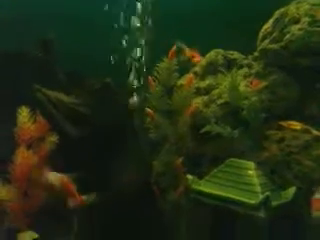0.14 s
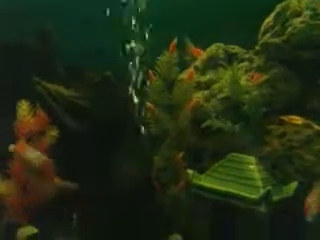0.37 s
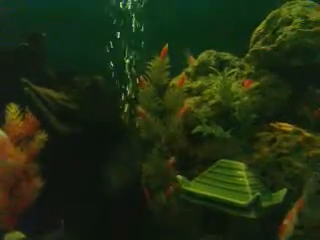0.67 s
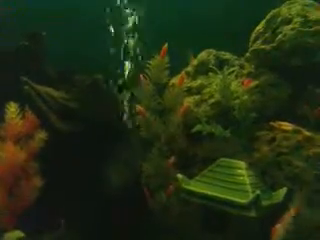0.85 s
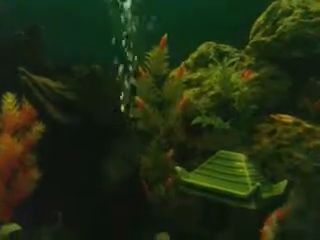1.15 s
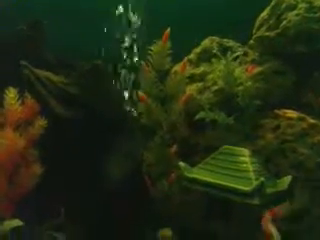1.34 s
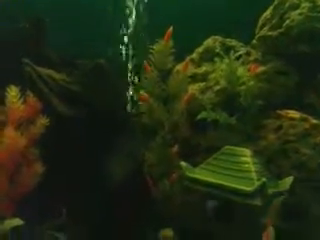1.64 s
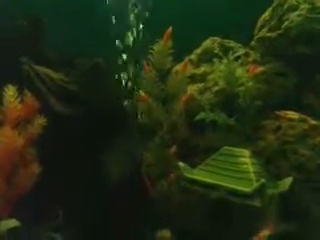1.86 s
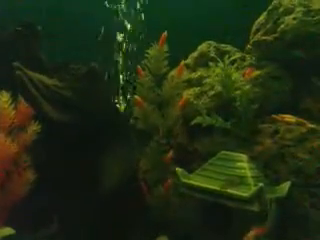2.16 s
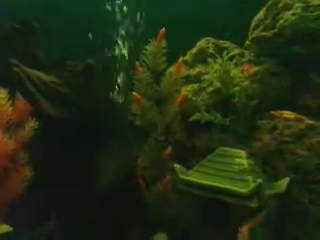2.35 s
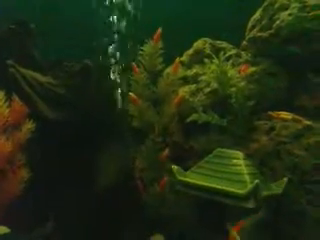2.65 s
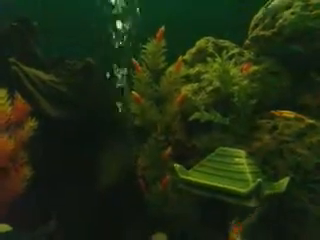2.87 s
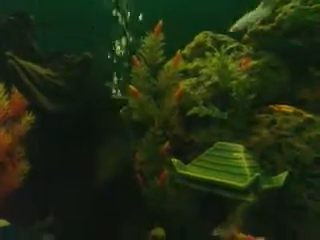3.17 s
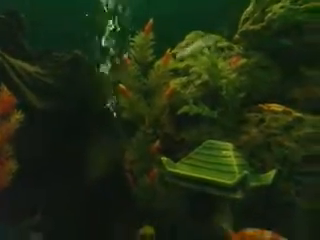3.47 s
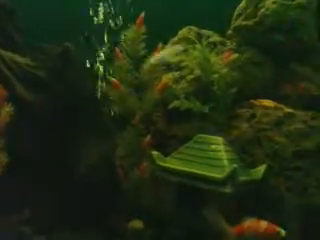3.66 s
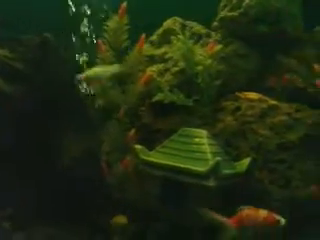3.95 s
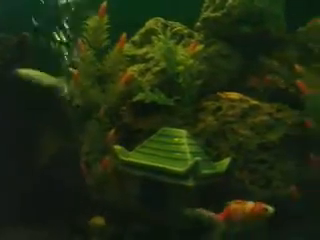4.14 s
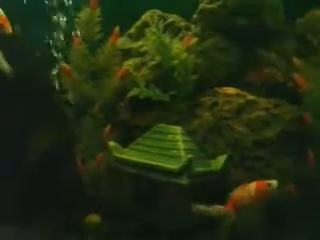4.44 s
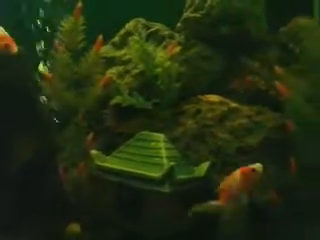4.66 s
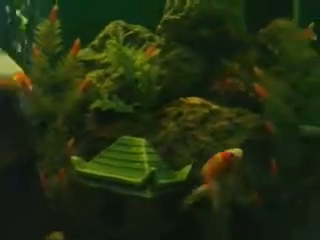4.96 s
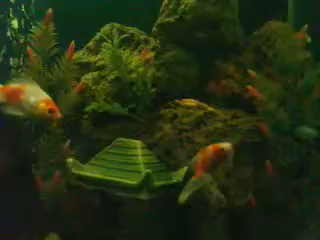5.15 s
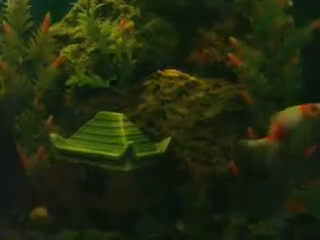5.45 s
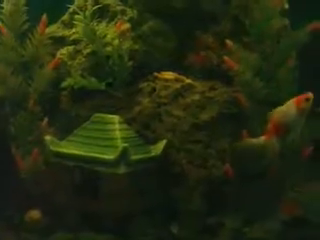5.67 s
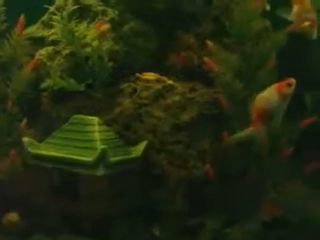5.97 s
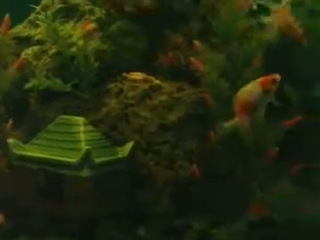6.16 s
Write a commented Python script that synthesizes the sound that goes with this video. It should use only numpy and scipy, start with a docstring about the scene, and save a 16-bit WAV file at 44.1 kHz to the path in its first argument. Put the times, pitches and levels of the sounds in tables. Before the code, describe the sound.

Continuous aquarium bubbling and low electric pump hum, brief high airy squeaks in the middle, then two loud, distorted knocks close to the microphone.

```python
"""A diaphragm air pump hums at mains rate beside a home fish tank, a harmonic series heard from close by.
Bubbles, as damped resonators, gurgle and fizz; noise makes the wash around them and the hiss of air.
Thin fluttering squeals come in three bouts, perhaps air forced through the line, with a few lone peeps.
The microphone drifts along the tank into another mix of the hum. Small pops come early; two sharp knocks
near the end overload the amplifier, which clips. The microphone is narrow-band."""
import sys
import numpy as np
from scipy.fft import rfft, irfft, next_fast_len
from scipy.io import wavfile
from scipy.ndimage import map_coordinates

SR = 44100
rng = np.random.default_rng(int(sys.argv[2]) if len(sys.argv) > 2 else 0)


def pcm_store(signal):
    """Save signal as 16-bit PCM."""
    levels = np.round(np.clip(np.atleast_2d(signal), -1, 1) * 32767)
    wavfile.write(sys.argv[1], SR, levels.astype(np.int16).T)


N = 278271

MAINS_HZ = 49.663  # stroke rate of the pump
# Harmonics of the pump. Each row: multiple of the stroke rate, level in dB in front of the bubbles,
# level in dB further along the tank.
PUMP_HARMONICS = [(3, -54, -74.5), (4, -29.5, -28.5), (5, -38.5, -38), (6, -40.5, -45), (7, -46.5, -35.5),
                  (8, -33.5, -43.5), (9, -41, -38), (10, -28, -43), (11, -35, -40), (12, -26.5, -26),
                  (13, -46.5, -49), (14, -34.5, -38), (15, -44, -36), (16, -34.5, -31), (17, -39, -41.5),
                  (18, -39, -65), (19, -49.5, -54.5), (20, -48, -57.5), (21, -31.5, -36.5),
                  (22, -41, -75.5), (23, -39.5, -51.5), (24, -51.5, -47.5), (25, -51, -33), (26, -61, -45),
                  (27, -42.5, -43), (28, -52, -39.5), (29, -48, -42.5), (30, -43, -53.5)]
# Drift of the microphone. Each row: time in seconds, share of the way along the tank (0-1).
MIC_DRIFT = [(0, 0), (3.3, 0.29), (4.0, .35), (4.7, 0.75), (5.3, 0.89), (6.3, 0.99)]
# Spectrum of the large bubbles and their wash. Each row: frequency in Hz, relative gain in dB.
GURGLE_SPECTRUM = [(25, -18), (50, -7.5), (90, -3), (135, -5), (175, 2), (225, 2), (280, -1), (450, -1),
                   (750, 1), (1100, -3), (1600, -14.5), (2200, -32), (4000, -48.5)]
# Level of the gurgle in dB in front of the column, and its change in dB further along the tank.
GURGLE_DB, GURGLE_ALONG_DB = -26, 1
# Spectrum of the small bubbles and their wash. Each row: frequency in Hz, relative gain in dB.
FIZZ_SPECTRUM = [(400, -26), (900, -3), (1500, 0), (1750, -2.5), (2050, -6), (2400, -4), (2800, -8.5),
                 (3200, -9), (3600, -14.5), (4000, -20.5), (4500, -30)]
# Course of the fizz. Each row: time in seconds, level in dB before the trim in water().
FIZZ_COURSE = [(0.0, -30.5), (1.4, -29), (1.91, -30.5), (2.9, -32), (3.28, -31.5), (3.83, -31),
               (4.51, -30.5), (6.07, -31), (6.3, -29.5)]
# Spectrum of the escaping air. Each row: frequency in Hz, relative gain in dB.
HISS_SPECTRUM = [(1500, -28), (2300, -10), (2750, 2.5), (3000, 0.5), (3150, 1.5), (3400, -9.5),
                 (3700, -20.5), (4500, -31.5)]
# The two resonances that squeal; linear rise time and exponential decay constant of a squeal.
LOW_HZ, HIGH_HZ = 2557, 2988
ATTACK_S, RELEASE_S = 0.017, 0.018
# Squeals in three bouts. Each row: start in seconds, time in seconds until the decay begins,
# low resonance in dB, high resonance in dB, both before the trims in squeals().
SQUEAL_EVENTS = [(1.375, .04, -42, -38), (1.462, .1, -38.5, -33), (1.636, 0.17, -26.5, -38.5),
                 (1.746, 0.13, -25.5, -30), (1.879, 0.058, -39.5, -29.5), (1.951, 0.087, -33.5, -23),
                 (2.135, 0.039, -44, -37), (2.268, 0.037, -35, -50), (2.6, 0.038, -39.5, -33),
                 (2.674, 0.03, -25.5, -23.5), (2.73, 0.024, -33, -20.5), (2.772, 0.14, -38.5, -32),
                 (2.93, 0.017, -42, -32.5), (3.09, .05, -34, -42), (3.141, .065, -29.5, -25.5),
                 (3.217, 0.037, -38, -18.5), (3.281, 0.092, -33.5, -27), (3.391, .06, -29, -25),
                 (3.459, .05, -33, -34), (3.575, 0.034, -32, -46), (3.66, .05, -38, -50)]
# Lone peeps, some pure and some airy. Each row: middle in seconds, length in seconds, pitch in Hz,
# pitch waver in Hz, level in dB.
PEEP_EVENTS = [(0.298, 0.22, 1677, 81, -28.5), (.7, .25, 2724, 82, -39), (.97, 0.11, 1733, 7.8, -26.5),
               (1.195, 0.4, 3206, 100, -39), (2.169, 0.43, 1300, 9.2, -33.5),
               (3.286, 0.18, 1696, 12, -34.5), (4.24, 0.27, 1018, 7, -30.5), (4.405, 0.96, 3180, 87, -40),
               (5.043, 0.35, 3170, 94, -38.5)]
# Knocks and pops. Each row: start in seconds, ring level in dB, main ring in Hz, ring t60 in seconds,
# crack level in dB before colouring, thump level in dB.
KNOCK_EVENTS = [(0.2627, 1.5, 1597, 0.0097, -30, -58), (0.2644, -2, 966, 0.019, -40, -57.5),
                (1.327, -7.5, 1250, 0.018, -45, -60), (5.3986, 5, 789, 0.031, -12, -40.5),
                (5.404, 6, 752, 0.027, -13.5, -36), (5.5742, 5.5, 761, 0.026, -6.5, -29.5),
                (5.5805, -1.5, 635, .045, 0.5, -15), (5.5875, -1, 621, .04, -15.5, -9.5)]
# Partials of a knock's ring. Each row: ratio to the main ring, relative level in dB.
RING_PARTIALS = [(1, 0), (.8, -10), (1.36, -8), (1.65, -12)]
# Spectrum of a knock's crack. Each row: frequency in Hz, gain in dB.
CRACK_SPECTRUM = [(30, -11), (200, -9.5), (1500, 11.5), (3800, 7.5), (5000, -1.0)]
# Treble roll-off of the microphone above its flat range. Each row: frequency in Hz, gain in dB.
MIC_RESPONSE = [(3300, 0), (4000, -5), (4400, -13.5), (4700, -38.5), (5200, -92)]
TOP_HZ = 15900  # upper limit after the amplifier


def amp(db):
    """Decibels are twenty times the logarithm of gain; this inverts them."""
    return 10 ** (np.asarray(db) / 20)


def unit(x):
    """Normalisation: divide by the root mean square, giving rms 1."""
    return x / np.sqrt(np.mean(x ** 2) + 1e-20)


def curves(rows):
    """Linear interpolation: one value per sample for each column after the time."""
    s, *cols = np.transpose(rows)
    return [np.interp(np.arange(N) / SR, s, c) for c in cols]


def wobble(rate):
    """Band-limited random motion: a smooth curve through random knots, rate of them a second."""
    knots = rng.standard_normal(int(N * rate / SR) + 4)
    return map_coordinates(knots, [np.arange(N) * rate / SR])


def filtered(x, response):
    """Linear filtering: the spectrum of x is multiplied by a response of frequency."""
    m = next_fast_len(N + SR // 2)
    return irfft(rfft(x, m) * response(np.fft.rfftfreq(m, 1 / SR)), m)[:N]


def coloured(x, points):
    """Spectral shaping: x is filtered by (Hz, dB) points joined on a log frequency axis."""
    f, db = np.transpose(points)
    return filtered(x, lambda hz: amp(np.interp(np.log(hz + 1), np.log(f), db)))


def pressure(from_s=1.2, to_s=3.85):
    """Strain, probably on the air line, 0-1: it builds and eases once, and the squeals come while it lasts."""
    t = np.arange(N) / SR
    progress = np.clip((t - from_s) / (to_s - from_s), 0, 1)
    return np.sqrt(np.sin(np.pi * progress).clip(0))


def squeal_levels():
    """Growth and decay of resonance: gains of the low and high modes as each squeal builds, holds and dies."""
    t = np.arange(N) / SR
    levels = np.zeros((2, N))
    for s, length, low_db, high_db in SQUEAL_EVENTS:
        build = np.clip((t - s) / ATTACK_S, 0, 1)
        decay = np.exp(-np.maximum(t - s - length, 0) / RELEASE_S)
        levels = np.maximum(levels, amp([[low_db], [high_db]]) * build * decay)
    return levels


def air(steady_db=-43, strained_db=-41, surge_db=-12, throb=0.15):
    """Flow noise: air hisses, more under strain and in squeals, throbbing with both half-strokes of the pump."""
    half_strokes = 1 + throb * np.sin(2 * np.pi * 2 * MAINS_HZ * np.arange(N) / SR)
    strained = amp(strained_db) * pressure()
    surge = amp(surge_db) * squeal_levels().sum(axis=0)
    level = np.sqrt(amp(steady_db) ** 2 + strained ** 2 + surge ** 2)
    hiss = coloured(rng.standard_normal(N), HISS_SPECTRUM)
    return level * unit(half_strokes * hiss)


def bubbles(count, low_hz, high_hz, cycles, spread_db, rise):
    """Bubble resonance: each is a damped sine whose pitch rises as it nears the surface."""
    when, size, strength = rng.random((count, 3)).T[:, :, None]
    hz = low_hz * (high_hz / low_hz) ** size
    t = np.arange(SR // 40) / SR
    age = t * hz / cycles  # the ring loses 20 dB in each unit of age
    gain = amp(spread_db * np.minimum(-np.log(1 - strength), 4)) * np.sqrt(hz)
    envelope = amp(-20 * age) * (1 - np.exp(-2 * t * hz))
    phase = 2 * np.pi * hz * t * (1 + rise * np.minimum(age, 2))
    ring = gain * envelope * np.sin(phase) * (1 - t / t[-1])
    index = (when * N).astype(int) + np.arange(t.size)
    return unit(np.bincount(index.ravel(), ring.ravel(), N)[:N])


def water(gurgle_wash_db=-2, fizz_wash_db=-1, gurgle_sway_db=0.45, fizz_db=1.0):
    """Superposition: large bubbles gurgle and small ones fizz, each over a wash of countless fainter ones."""
    gurgle_level = GURGLE_DB + GURGLE_ALONG_DB * curves(MIC_DRIFT)[0] + gurgle_sway_db * wobble(3.6)
    fizz_level = curves(FIZZ_COURSE)[0] + fizz_db
    large = bubbles(count=3000, low_hz=168.9, high_hz=1483, cycles=7, spread_db=2.5, rise=0.075)
    small = bubbles(count=5000, low_hz=900, high_hz=4200, cycles=6, spread_db=2.7, rise=.04)
    gurgle_wash = unit(coloured(rng.standard_normal(N), GURGLE_SPECTRUM))
    fizz_wash = unit(coloured(rng.standard_normal(N), FIZZ_SPECTRUM))
    gurgle = unit(coloured(large, GURGLE_SPECTRUM)) + amp(gurgle_wash_db) * gurgle_wash
    fizz = unit(coloured(small, FIZZ_SPECTRUM)) + amp(fizz_wash_db) * fizz_wash
    return amp(gurgle_level) * unit(gurgle) + amp(fizz_level) * unit(fizz)


def knocks(crack_t60=0.038, thump_hz=85, thump_t60=0.049, attack_s=0.00079):
    """Impact excitation: each blow is a short hollow modal ring, a crack of noise and a low push."""
    t = np.arange(SR // 8) / SR
    onset = 1 - np.exp(-t / attack_s)
    body, cracks = np.zeros(N + SR), np.zeros(N + SR)
    for s, db, hz, t60, crack_db, thump_db in KNOCK_EVENTS:
        partials = sum(amp(level) * np.sin(2 * np.pi * hz * ratio * t) for ratio, level in RING_PARTIALS)
        ring = amp(db - 60 * t / t60) * partials
        thump = amp(thump_db - 60 * t / thump_t60) * np.sin(2 * np.pi * thump_hz * t)
        crack = amp(crack_db - 60 * t / crack_t60) * rng.standard_normal(len(t))
        start = round(s * SR)
        body[start:][:len(t)] += onset * (ring + thump)
        cracks[start:][:len(t)] += onset * crack
    return body[:N] + coloured(cracks[:N], CRACK_SPECTRUM)


def whistle(hz, waver_hz):
    """Random frequency and amplitude modulation: a thin rough tone of rms 1 that flutters quickly."""
    pitch = hz + waver_hz * (wobble(160) + .3 * wobble(5))
    flutter = amp(1.8 * wobble(130) + 1.6 * wobble(45))
    return unit(flutter * np.sin(2 * np.pi * np.cumsum(pitch) / SR))


def squeals(low_db=0.0, high_db=0.5, low_idle_db=-41, high_idle_db=-48, flicker_db=2.5):
    """Resonance: two fixed modes squeal, flickering faintly while the strain lasts; a few peeps sound alone."""
    t = np.arange(N) / SR
    low, high = squeal_levels()
    idle = pressure() * amp(flicker_db * wobble(22))
    low_gain = np.hypot(amp(low_db) * low, amp(low_idle_db) * idle)
    high_gain = np.hypot(amp(high_db) * high, amp(high_idle_db) * idle)
    out = low_gain * whistle(LOW_HZ, waver_hz=12) + high_gain * whistle(HIGH_HZ, waver_hz=13)
    for middle, length, hz, waver_hz, db in PEEP_EVENTS:
        swell = np.cos(np.pi * np.clip((t - middle) / length, -.5, .5))
        out += amp(db) * swell * whistle(hz, waver_hz)
    return out


def pump(waver_db=0.35, buzz_db=-49, buzz_fall_db=-9):
    """Fourier series: regular strokes sum as harmonics; standing waves in the room weight each by place."""
    turn = 2 * np.pi * MAINS_HZ * np.arange(N) / SR
    place = np.clip(curves(MIC_DRIFT)[0], 0, 1)
    hum = np.zeros(N)
    for order, here_db, there_db in PUMP_HARMONICS:
        level = (1 - place) * amp(here_db) + place * amp(there_db)
        waver = amp(waver_db * wobble(1.6))
        hum += level * waver * np.sin(order * turn + rng.uniform(0, 2 * np.pi))
    # the valves' slap carries the series on as a faint buzz, falling with each octave
    orders = np.arange(31, 62)
    for order in orders:
        level = amp(buzz_db + buzz_fall_db * np.log2(order / orders[0]) + rng.normal(0, 0.48))
        hum += level * np.sin(order * turn + rng.uniform(0, 2 * np.pi))
    return np.sqrt(2) * hum  # makes each level an rms level


def scene():
    """Superposition of air, water, knocks, squeals and pump at one microphone."""
    return (air() + water() + knocks() + squeals() + pump())[None]


def record(dry, ceiling=0.7, hardness=14, low_cut_hz=45):
    """Band limiting, then saturation: the amplifier flattens loud peaks, whose splash reaches above the band."""
    x = coloured(dry[0], MIC_RESPONSE)
    x = x / (1 + np.abs(x / ceiling) ** hardness) ** (1 / hardness)
    return filtered(x, lambda hz: (hz < TOP_HZ) * hz / np.hypot(hz, low_cut_hz))[None]


dry = scene()
out = record(dry)
pcm_store(out)
```